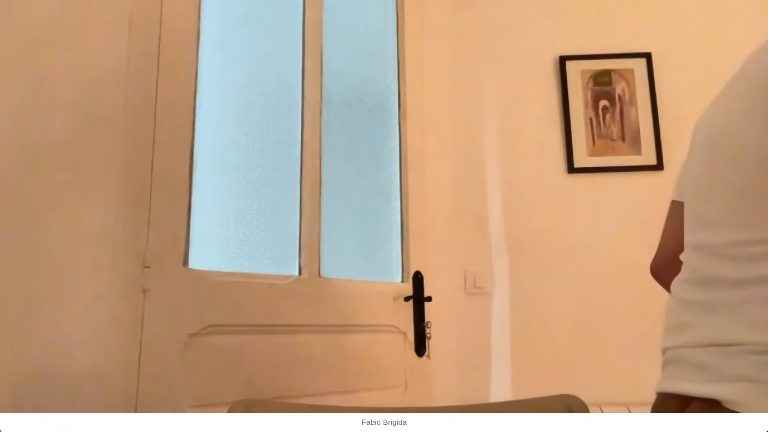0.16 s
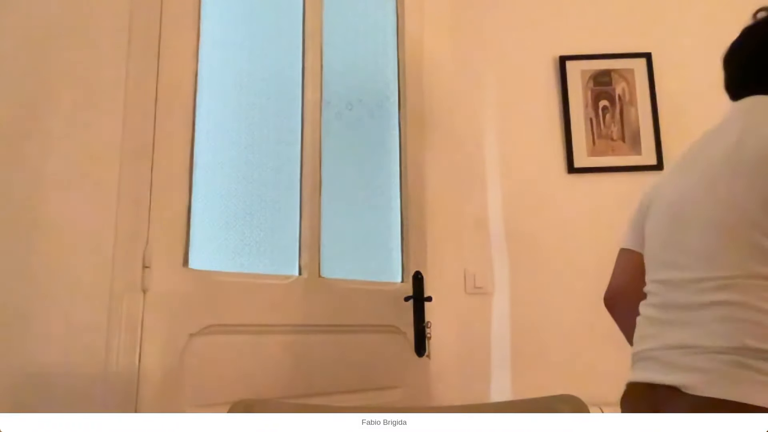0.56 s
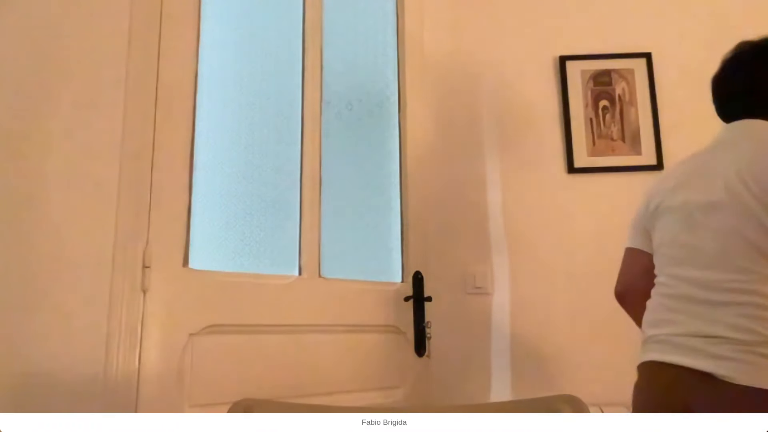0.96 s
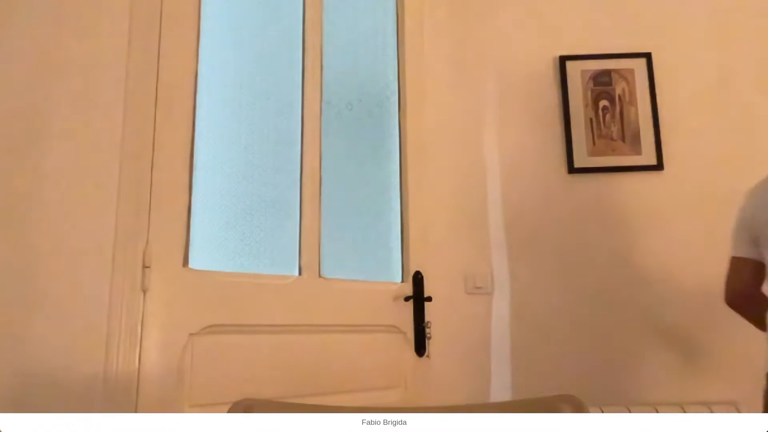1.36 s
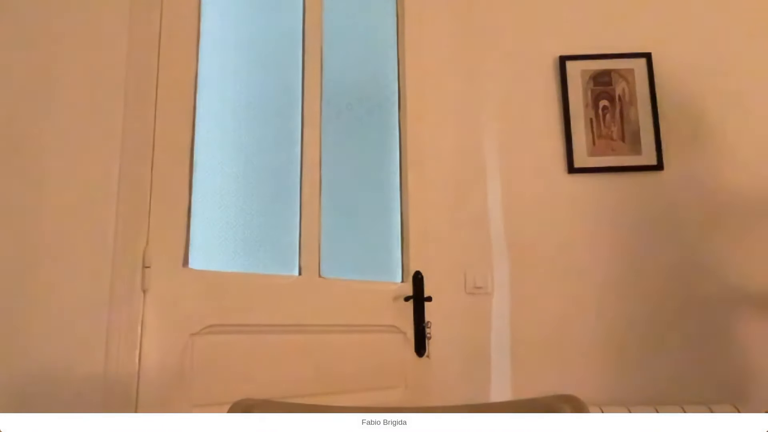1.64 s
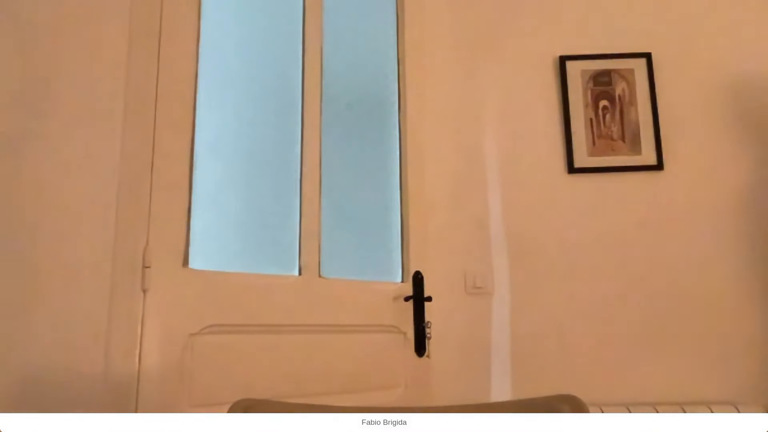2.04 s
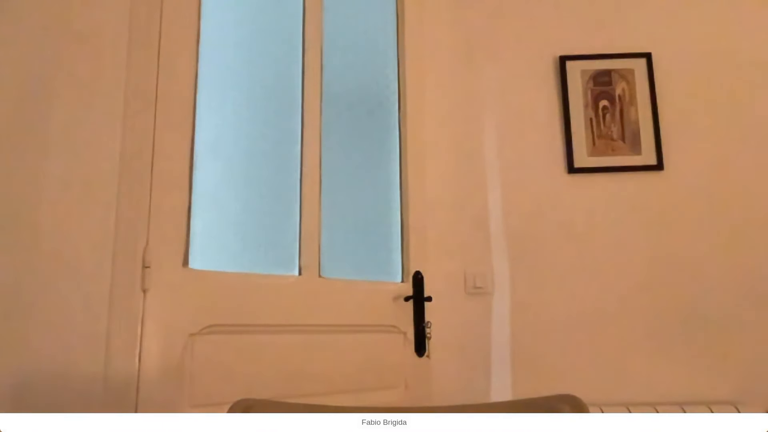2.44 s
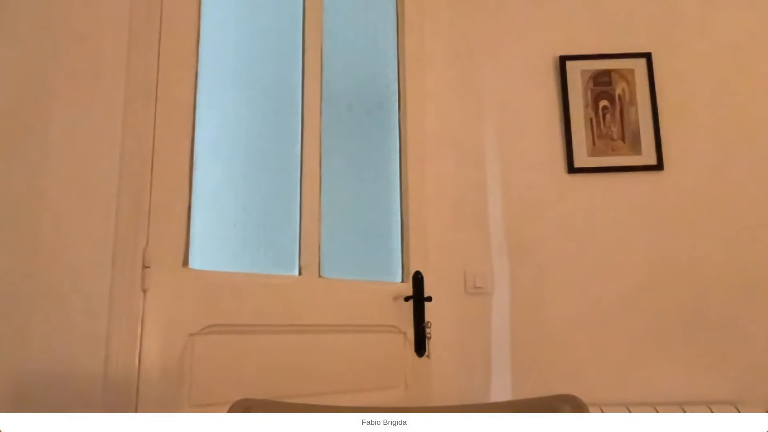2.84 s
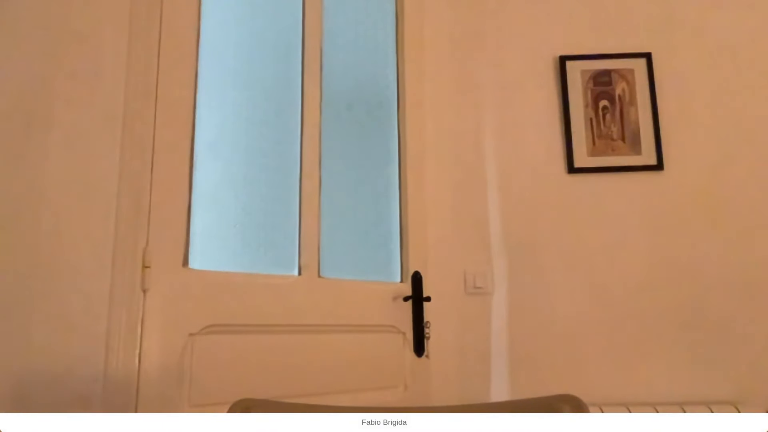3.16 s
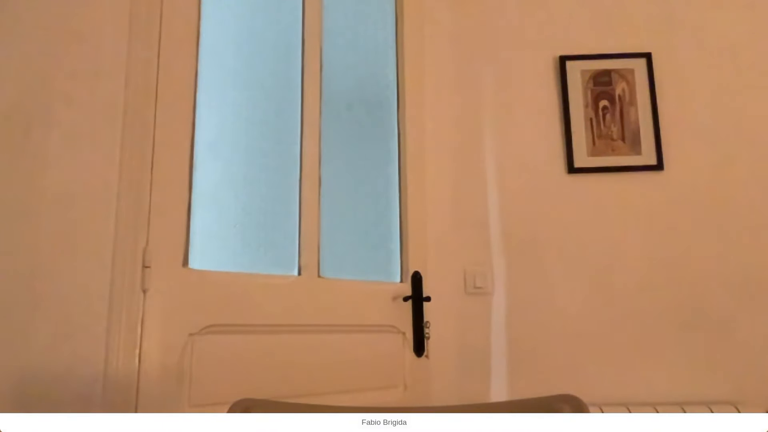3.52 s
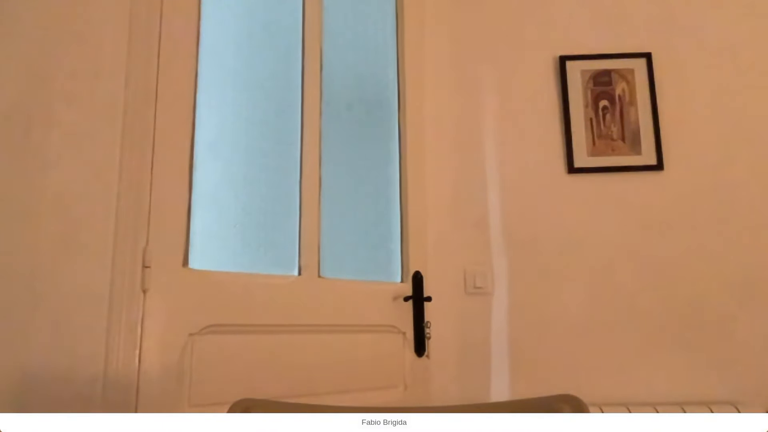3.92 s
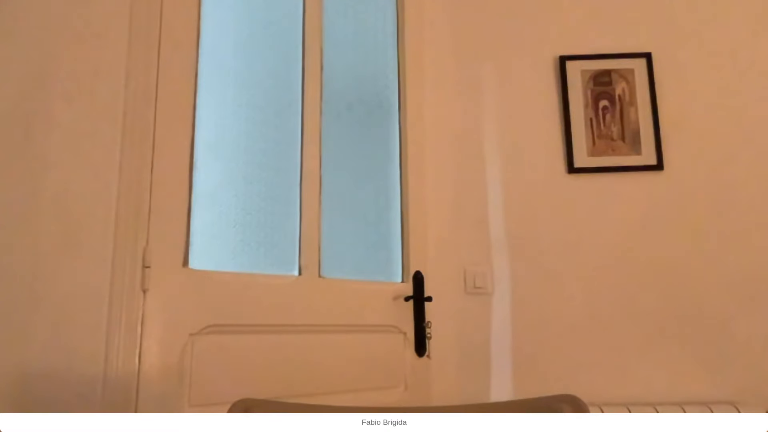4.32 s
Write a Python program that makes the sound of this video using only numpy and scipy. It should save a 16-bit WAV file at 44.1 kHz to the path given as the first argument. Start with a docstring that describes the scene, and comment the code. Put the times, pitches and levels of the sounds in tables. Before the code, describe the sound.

A shoe sole scrapes sharply over gritty tiles, followed by a few faint, lighter scuffing steps in a quiet, bare room. Then a window latch rattles its wooden frame, the sash tears loose with a loud hollow clunk, and it swings with low rumbling, dull knocks and a shuddering pane before settling into faint room hiss. Close stereo microphones, short room echo.

```python
"""A wooden casement window opens in a bare room, after someone has scuffed up to it across a tiled floor.
The latch is bursts of noise that rattle the frame; the sash jerks free with a clunk that rings wood and pane,
then it swings open with rumbling, rubbing, dull knocks and a shuddering pane. Before that come the gritty slide
of a sole, made of friction grains and a hollow resonance, and a few lighter steps. A shirt rustles faintly,
and the room hisses quietly."""
import sys
import numpy as np
from scipy import signal
from scipy.fft import rfft, irfft
from scipy.io import wavfile

SR = 44100
rng = np.random.default_rng(int(sys.argv[2]) if len(sys.argv) > 2 else 0)


def master(y):
    """Save y as 16-bit WAV."""
    cut = np.clip(np.atleast_2d(y).T, -1, 1)
    pcm = np.round(cut * 32767)  # scale
    wavfile.write(sys.argv[1], SR, pcm.astype(np.int16))


N = 197832
TIME = np.arange(N) / SR

# the handle turns and squeaks: (time [s], length [s], level [dB])
HANDLE_TURNS = [(2.35, .04, -73), (2.5, .1, -71)]
# the bolt catches: (time [s], level [dB])
BOLT_CATCHES = [(2.6165, 1), (2.626, -2.5), (2.646, 1), (2.676, 1)]
# tone of the rattling latch: (frequency [Hz], relative level [dB])
LATCH_COLOUR = [(100, -27), (170, -26), (215, -1.5), (355, 0), (480, -0.5), (700, 3), (1200, -1),
                (1960, -8.5), (3500, -13), (5870, -17), (7730, -18.5), (9000, -11), (15500, -15)]
# ringing of the closed frame: (frequency [Hz], level [dB], time to fade by 60 dB [s])
FRAME_MODES = [(220, -24.5, 0.4), (241.7, -14, 0.45), (376, -51, 0.17), (447.4, -4.5, 0.37),
               (470, -20.5, 0.94)]
# the bolt grinds ever harder up to its first catch
GRIND_DB, GRIND_SWELL_DB_PER_S = -34, 752


def latch():
    """The handle squeaks, then the bolt grinds back in a run of contacts that rattle the frame."""
    turning = strokes(HANDLE_TURNS, attack_s=0.04, release_s=0.02)
    flutter = from_db(3.8 * resonance(0, width_hz=40))
    squeak = resonance(2550, width_hz=790) * turning * flutter
    to_go_s = BOLT_CATCHES[0][0] - TIME
    swell = from_db(GRIND_DB - GRIND_SWELL_DB_PER_S * np.abs(to_go_s))
    grind = grains(per_s=3200, spread_db=-2.5) * (to_go_s > 0) * swell
    catches = rebounding(BOLT_CATCHES, gap_s=0.016, loss_db=6.5)
    blows = grind + contacts(catches, chatter_s=0.0029)
    rattle = through(blows, colour(LATCH_COLOUR))
    return room(squeak + rattle, direct_db=-3.5, width_db=-40.5) + ringing(blows, FRAME_MODES)


# the sash jerks out of the frame: (time [s], level [dB])
SASH_JERKS = [(2.808, -3.5), (2.8155, 5), (2.827, 4), (2.866, -0.5), (2.905, -6)]
# tone of the wooden crack: (frequency [Hz], relative level [dB])
SASH_COLOUR = [(40, -23), (66, -7), (117, -8), (170, -1), (300, -9.5), (480, -2.5), (700, 0), (1250, -0.5),
               (1960, -15), (4000, -20), (7160, -25), (9400, -17), (15500, -24)]
# ringing of sash and pane: (frequency [Hz], level [dB], time to fade by 60 dB [s])
SASH_MODES = [(70, -7, 0.38), (153.8, -3.5, 0.25), (221.2, -7, 0.4), (567, -38, 0.38), (703, -15, 0.18),
              (850, -11, 0.4), (963, -9.5, 0.48), (1174, -11.5, 0.29), (1166, -11.5, 0.28),
              (1355, -20.5, 0.3), (1510, -8, 0.11)]


def sash():
    """The sash tears free with a dense wooden crack that sets frame and pane ringing."""
    jerks = rebounding(SASH_JERKS, gap_s=0.026, loss_db=8.5)
    force = contacts(jerks, chatter_s=0.0035)
    crack = from_db(-4.0) * through(force, colour(SASH_COLOUR))
    return room(crack, direct_db=-1.0, width_db=-58) + ringing(force, SASH_MODES)


# pulls on the sash, which then coasts to rest: (time [s], length [s], rumble level [dB])
PULLS = [(2.97, .08, -59), (3.39, 0.035, -55.5), (3.96, 0.57, -73)]
# tone of the rumbling frame: (frequency [Hz], relative level [dB])
SWING_COLOUR = [(45, -16.5), (70, 8.5), (130, -4), (280, 4.5), (500, -4.5), (1000, -15.5), (1500, -12.5),
                (2300, -26.5), (6000, -33)]
# the dry hinge rubs: (time [s], length [s], level [dB])
HINGE_RUBS = [(3.02, 0.053, -62), (3.125, .045, -59), (3.42, 0.074, -53.5)]
# the pane shudders: (time [s], level [dB])
SHUDDERS = [(3.03, -59), (3.21, -53.5), (3.48, -61), (3.57, -55), (3.72, -70.5), (4.03, -72.5)]


def swing():
    """The frame rumbles on its hinges after each pull, a dry hinge rubs and the pane shudders in its lowest mode."""
    speed = strokes(PULLS, attack_s=0.026, release_s=0.29)
    rumble = through(grains(per_s=470, spread_db=2.0) * speed, colour(SWING_COLOUR))
    rub = resonance(1270, width_hz=290) * strokes(HINGE_RUBS, attack_s=0.06, release_s=0.012)
    shudder_rows = [(s, 0.024, db) for s, db in SHUDDERS]  # every shudder is held for 0.024 s
    shudder = strokes(shudder_rows, attack_s=0.03, release_s=0.035)
    pane = resonance(SASH_MODES[0][0], width_hz=20.4) * shudder
    return room(rumble + rub, direct_db=-3.0, width_db=-24.0) + pane


# dull knocks of the opening sash: (time [s], level [dB], pitch [Hz])
KNOCKS = [(3.138, -21.5, 316), (3.272, -31.5, 451), (3.315, -24.5, 393), (3.337, -13.5, 344),
          (3.373, -16, 290), (3.501, -28, 258), (4.429, -34.5, 290)]


def knocks():
    """Soft blows of the sash: bursts of noise, each a little under an octave wide around its own pitch."""
    out = 0
    for s, db, hz in KNOCKS:
        body = signal.butter(2, [hz / 1.42, hz * 1.29], "band", fs=SR, output="sos")
        blow = contacts([(s, 0)], chatter_s=0.013) + 1e-18
        out = out + from_db(db) * unit_energy(signal.sosfilt(body, blow))
    return room(out, direct_db=2.5, width_db=-22)


# the sole touches, stamps, slides on and lifts:
# (time [s], length [s], friction level [dB], hollow level [dB], thud level [dB])
SCRAPES = [(0, .05, -43, -59.5, -76), (0.129, 0.079, -51.5, -57, -63), (0.189, 0.03, -24, -53.5, -57),
           (.21, 0.026, -19, -31.5, -45.5), (0.245, 0.28, -25.5, -41, -66.5),
           (.55, 0.039, -53.5, -46.5, -84), (0.599, 0.041, -46, -52, -78.5)]
# pitch of the hollow under the sole: (time [s], frequency [Hz])
SOLE_HZ = [(0, 1946), (.23, 1655), (.4, 1502), (.5, 1526), (.57, 1697), (.64, 1814)]
# tone of the friction: (frequency [Hz], relative level [dB])
FRICTION_COLOUR = [(250, -43), (350, -12), (600, -26.5), (900, -11), (1500, -14.5), (2500, -7.5),
                   (3600, -3), (4700, -4), (6500, 3), (8000, 0), (10200, 5), (12500, 1), (15000, -0.5)]
# grit cracking under the sole: (time [s], starting level [dB], decay time [s])
GRIT = [(0.053, -26, 0.00077), (0.0608, -33, 0.00041), (0.153, -34, 0.00083), (0.2015, -5.5, 0.0009),
        (0.2165, -7.5, 0.0013), (0.2195, -4, 0.0021), (0.249, -13, 0.0025)]
# thin ringing of the grit: (frequency [Hz], level [dB], time to fade by 60 dB [s])
GRIT_MODES = [(5810, -13.5, .25), (6740, -14, .2), (10010, -5.5, 0.11), (9535, -9, .12), (11200, -4, .2),
              (12850, -8, 0.17), (14300, -8, .2)]
# as the weight comes off the foot, friction fades faster than the hollow under the sole
FRICTION_FADE_DB_PER_S, HOLLOW_FADE_DB_PER_S = 53, 22.5
# the slide sounds wide only when loud: friction level of full width, dB of width lost per dB below it
WIDE_ABOVE_DB, NARROWING = -17, 0.9


def slide():
    """A sole drags over the tiles: friction that catches and slips, a hollow resonance, a thud and cracking grit."""
    start, length, friction_db, hollow_db, thud_db = np.transpose(SCRAPES)
    shape = {"attack_s": 0.015, "release_s": 0.024}
    friction = strokes(zip(start, length, friction_db), fade_db_per_s=FRICTION_FADE_DB_PER_S, **shape)
    hollow_gain = strokes(zip(start, length, hollow_db), fade_db_per_s=HOLLOW_FADE_DB_PER_S, **shape)
    thud_gain = strokes(zip(start, length, thud_db), **shape)
    catching = from_db(0.83 * resonance(0, width_hz=58))
    sole_hz = in_time(SOLE_HZ)[0]
    positions = []
    for _ in range(2):
        hiss = through(grains(per_s=6000, spread_db=1.5) * friction, colour(FRICTION_COLOUR))[0]
        # the echo between sole and floor shifts as the foot rolls, so the colour keeps moving
        lag_s = 0.0008 + 0.00004 * resonance(0, width_hz=20)
        hiss = 0.8 * hiss + 0.6 * np.interp(TIME - lag_s, TIME, hiss)
        hollow = resonance(sole_hz, width_hz=720)
        hollow = hollow + from_db(-7.0) * resonance(1.7 * sole_hz, width_hz=1400)
        thud = high_pass(resonance(320, width_hz=260, order=4) * thud_gain, 190, order=4)
        positions.append((hiss + hollow * hollow_gain) * catching + thud)

    crack_gain = sum(from_db(db) * (TIME >= s) * np.exp(-np.abs(TIME - s) / decay) for s, db, decay in GRIT)
    cracks = crack_gain * rng.standard_normal(N)
    grit = through(cracks, colour(FRICTION_COLOUR, tilt_db=8.0))
    grit = grit + high_pass(ringing(cracks, GRIT_MODES), 2000, order=2)

    both = moving_room(positions, direct_db=4.5, width_db=3.0) + room(grit, direct_db=14.0, width_db=0.0)
    mid = both.mean(axis=0)
    width = np.clip(friction / from_db(WIDE_ABOVE_DB), 1e-6, 1) ** NARROWING
    return mid + width * (both - mid)


# steps: (time [s], length [s], scuff level [dB], treble tilt [dB per octave],
# hollow level [dB], hollow pitch [Hz], hollow width [Hz], heel level [dB])
STEPS = [(0.912, 0.11, -57.5, 5.5, -59.5, 1587, 798, -68), (1.185, 0.05, -67, 4.5, -71, 2800, 1203, -87),
         (1.366, 0.078, -54, 3.5, -47.5, 1752, 480, -83), (1.707, 0.042, -73.5, -6.5, -76, 2800, 1200, -72),
         (1.951, 0.098, -40, 0.5, -43.5, 1963, 650, -65)]
# tone of a scuff: (frequency [Hz], relative level [dB])
SCUFF_COLOUR = [(400, -22), (800, -22.5), (1200, 4), (1600, -1), (2000, -3.5), (3000, -8.5), (4000, -8),
                (5200, -10.5), (7500, -21), (10100, -13.5), (15500, -21)]


def steps():
    """Each step is a soft heel thud under a short scuff that rings in the hollow of the sole."""
    out = 0
    for s, length, scuff_db, tilt_db, hollow_db, hz, width_hz, heel_db in STEPS:
        press = np.sin(np.pi * np.clip((TIME - s) / length, 0, 1)).clip(0) ** 1.06
        rubbing = grains(per_s=4500, spread_db=-0.5) * press
        scuff = from_db(scuff_db) * through(rubbing, colour(SCUFF_COLOUR, tilt_db))
        hollow = from_db(hollow_db) * resonance(hz, width_hz)
        heel = from_db(heel_db) * resonance(130, width_hz=300)
        out = out + scuff + press * (hollow + heel)
    return room(out, direct_db=4.0, width_db=-26.5)


# movements of the shirt: (time [s], length [s], level [dB])
RUSTLES = [(.69, 0.045, -74), (1.19, 0.25, -73.5), (1.655, .1, -71.5), (1.77, 0.15, -70), (2.35, .05, -68),
           (2.47, 0.16, -67.5), (3.29, 0.18, -69)]
# tone of the cloth: (frequency [Hz], relative level [dB])
CLOTH_COLOUR = [(300, -25), (1000, -3), (2500, -2.5), (4500, -6.5), (7500, -4.5), (10000, 2.5),
                (15000, -3.5)]


def clothes():
    """Faint rustle of a shirt: friction grains that never quite stop and swell with each movement."""
    motion = from_db(-82.5) + strokes(RUSTLES, attack_s=0.011, release_s=0.055)
    rustle = through(grains(per_s=7200, spread_db=2.0) * motion, colour(CLOTH_COLOUR))
    return room(rustle, direct_db=4.5, width_db=-18)


# tone of the quiet room: (frequency [Hz], relative level [dB])
AIR_COLOUR = [(30, -5.5), (114, 1), (240, 1), (340, -2.5), (700, -4), (1360, -10), (3000, -15), (7650, -21),
              (9200, -13), (14300, -11.5), (15500, -16.5)]


def air():
    """The quiet hiss of the room: steady coloured noise."""
    noise = spread(*rng.standard_normal((2, N)), width_db=-22.5)
    return from_db(-71.5) * through(noise, colour(AIR_COLOUR))


def from_db(db):
    """Decibels to gain."""
    return 10 ** (np.asarray(db) / 20)


def rms_one(x):
    """Scale to rms 1."""
    return x / np.sqrt(np.mean(x ** 2) + 1e-20)


def unit_energy(x):
    """Scale a response so that it passes white noise at the same level."""
    return rms_one(x) / np.sqrt(x.shape[-1])


def in_time(rows):
    """The columns of a curve at every sample."""
    s, *columns = np.transpose(rows)
    return [np.interp(TIME, s, c) for c in columns]


def at_hz(points, hz):
    """Read a table on a log-frequency axis."""
    f, value = np.transpose(points)
    return np.interp(np.log(hz + 1), np.log(f), value)


def through(x, response):
    """Causal convolution, channel by channel."""
    return signal.fftconvolve(np.atleast_2d(x), np.atleast_2d(response), axes=-1)[:, :N]


def high_pass(x, hz, order):
    """Take away what lies below a frequency."""
    return signal.sosfilt(signal.butter(order, hz, "high", fs=SR, output="sos"), x)


def colour(spectrum, tilt_db=0, size=8192):
    """Minimum-phase response of a spectrum, tilted per octave above 2 kHz and steep below its first point."""
    hz = np.arange(size // 2 + 1) * SR / size + 1
    tilt = tilt_db * np.log2(np.maximum(hz / 2000, 1))
    bass_fall = 20 * np.log2(np.clip(hz / spectrum[0][0], 0.1, 1))
    db = at_hz(spectrum, hz) + tilt + bass_fall
    # folding the cepstrum puts the energy as early as possible
    cepstrum = irfft(np.log(from_db(db)))
    cepstrum[1:size // 2] *= 2
    cepstrum[size // 2 + 1:] = 0
    return unit_energy(irfft(np.exp(rfft(cepstrum))))


def grains(per_s, spread_db):
    """Friction: a dense stream of tiny slips of uneven size."""
    sizes = from_db(spread_db * np.minimum(rng.exponential(1, N), 4)) * rng.standard_normal(N)
    return rms_one(sizes * (rng.random(N) < per_s / SR))


def resonance(hz, width_hz, order=2):
    """Noise in a resonance whose centre may move; centred on 0 Hz it is a slow random wander."""
    low = signal.butter(order, width_hz / 2, fs=SR, output="sos")
    a, b = signal.sosfilt(low, rng.standard_normal((2, N + SR)))[:, SR:]
    phase = 2 * np.pi * np.cumsum(hz * np.ones(N)) / SR
    return rms_one(a * np.cos(phase) + b * np.sin(phase))


def contacts(rows, chatter_s, size=4096):
    """Each contact is a short burst of chatter that swells as the parts press together, then dies away."""
    out = np.zeros(N + size)
    age = TIME[:size] / chatter_s
    for s, db in rows:
        at = int(s * SR)
        burst = rng.standard_normal(size) * np.sqrt(age) * np.exp(-age)
        out[at:at + size] += from_db(db) * unit_energy(burst)
    return out[:N]


def rebounding(rows, gap_s, loss_db, count=4):
    """Each blow comes back at slightly uneven gaps, weaker every time."""
    uneven = rng.uniform(0.85, 1.15, (len(rows), count))
    blows = []
    for (s, db), u in zip(rows, uneven):
        blows += [(s + k * gap_s * u[k], db - k * loss_db) for k in range(count)]
    return blows


def ringing(force, modes):
    """Decaying modes driven by a force; each takes the energy that its level gives."""
    t = TIME[:SR]
    out = 0
    for hz, db, t60 in modes:
        mode = from_db(-60 * t / t60) * np.sin(2 * np.pi * hz * t)
        out = out + from_db(db) * unit_energy(through(force, mode))
    return out


def stroke(s, length, attack_s, release_s, fade_db_per_s=0):
    """Envelope of one movement: a linear attack, a hold that may fade, an exponential release."""
    age = TIME - s
    hold = from_db(-fade_db_per_s * np.clip(age, 0, length))
    return np.clip(age / attack_s, 0, 1) * hold * np.exp(-np.maximum(age - length, 0) / release_s)


def strokes(rows, attack_s, release_s, fade_db_per_s=0):
    """Gain of several movements (time [s], length [s], level [dB]) that share one shape."""
    return sum(from_db(db) * stroke(s, length, attack_s, release_s, fade_db_per_s) for s, length, db in rows)


# stereo width of the sound: (frequency [Hz], side against mid level [dB])
WIDTH = [(100, -13), (400, -18), (1500, -24), (3500, -11.5), (7500, -5), (12000, -10), (15000, -1.5)]


def spread(x, other, width_db):
    """Two close microphones agree in the bass and part in the treble."""
    hz = np.arange(len(x) // 2 + 1) * SR / len(x)
    side = irfft(rfft(other) * from_db(at_hz(WIDTH, hz) + width_db), len(x))
    return np.array([x + side, x - side])


# echo of the bare room: (frequency [Hz], time to fade by 60 dB [s])
ROOM_T60 = [(70, 0.02), (250, 0.3056), (600, 0.5456), (1400, 0.25), (3000, 0.4843), (8000, 0.3951),
            (15000, 0.25)]


def room(x, direct_db, width_db):
    """Direct sound, quick echoes from surfaces beside the source, and a diffuse tail, band by band."""
    t = TIME[:SR * 4 // 5]
    hz = np.arange(len(t) // 2 + 1) * SR / len(t)
    centres = np.geomspace(60, 16000, 9)
    white = rfft(rng.standard_normal((2, len(t))))
    tail = 0
    for centre, pick in zip(centres, np.eye(len(centres))):
        band = irfft(white * np.interp(np.log(hz + 1), np.log(centres), pick), len(t))
        tail = tail + band * from_db(-60 * t / at_hz(ROOM_T60, centre))
    early = from_db(-0.5) * unit_energy(rng.standard_normal((2, len(t))) * np.exp(-t / 0.0059))
    early[0, 0] += 1  # the direct sound
    response = unit_energy(unit_energy(tail) + from_db(direct_db) * unit_energy(early))
    return through(x, spread(*response, width_db))


def moving_room(positions, direct_db, width_db):
    """A sliding source meets ever different echoes: the sound wanders between a few positions."""
    weights = np.array([resonance(0, width_hz=16) for _ in positions])
    weights = weights / np.sqrt(np.sum(weights ** 2, axis=0))
    return sum(room(part * w, direct_db, width_db) for part, w in zip(positions, weights))


def scene():
    """All sources over the quiet hiss of the room."""
    window = latch() + sash() + swing() + knocks()
    person = slide() + steps() + clothes()
    return window + person + air()


# brief dips of the level: (time [s], length [s], depth [dB])
DIPS = [(3.892, 0.052, -22.5), (4.295, 0.016, -19.5)]


def record(dry):
    """The microphone loses the deepest bass; the bass drops out once, the level dips twice, the top is cut."""
    sound = high_pass(dry, 45.02, order=3)
    thin = stroke(0.278, length=0.15, attack_s=0.024, release_s=0.023)
    upper = signal.sosfiltfilt(signal.butter(8, 390, "high", fs=SR, output="sos"), sound)
    dip_db = sum(db * stroke(s, length, attack_s=0.02, release_s=0.0047) for s, length, db in DIPS)
    heard = (sound + thin * (upper - sound)) * from_db(dip_db)
    top_cut = signal.ellip(12, 0.1, 80, 15400, fs=SR, output="sos")
    return signal.sosfilt(top_cut, heard)


dry = scene()
out = record(dry)
master(out)
```